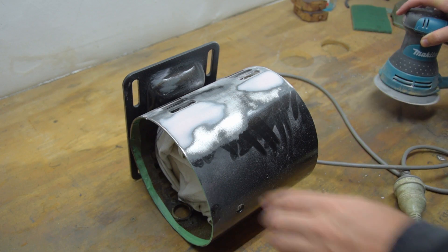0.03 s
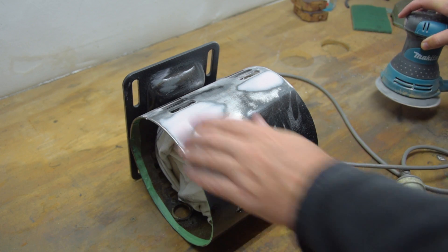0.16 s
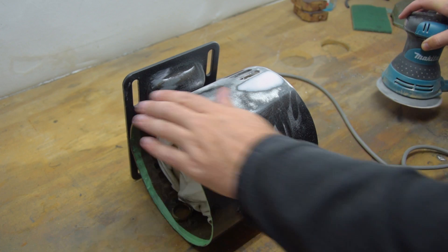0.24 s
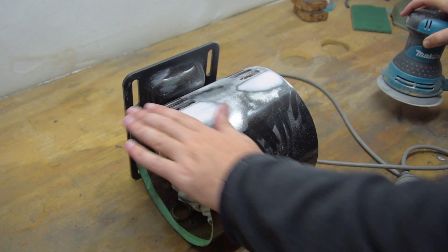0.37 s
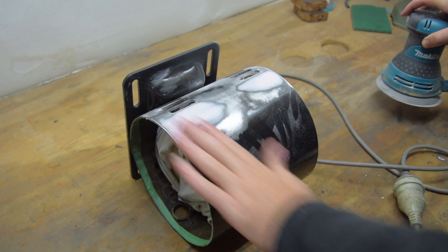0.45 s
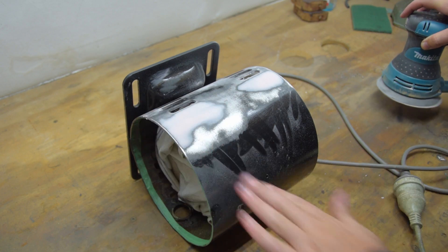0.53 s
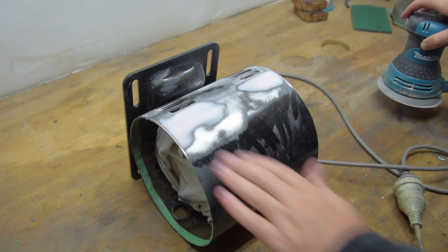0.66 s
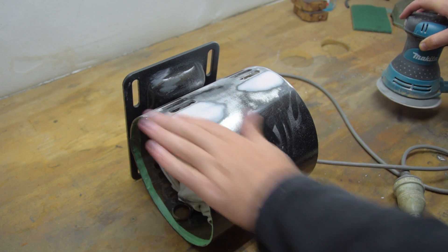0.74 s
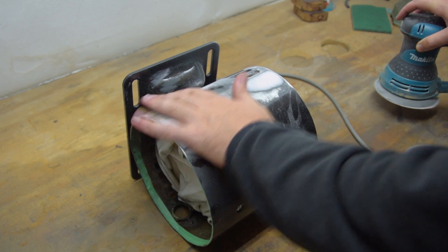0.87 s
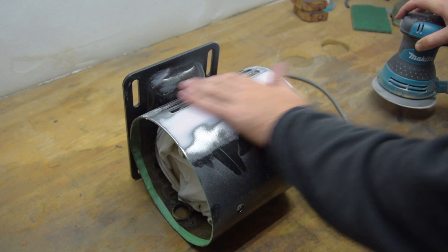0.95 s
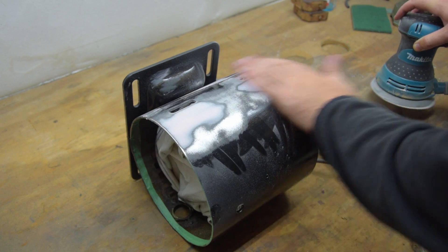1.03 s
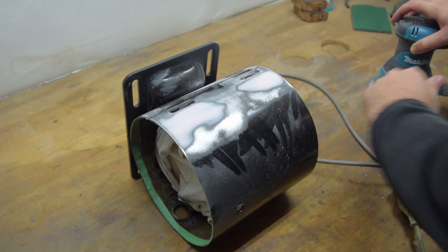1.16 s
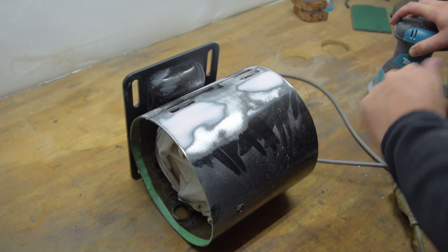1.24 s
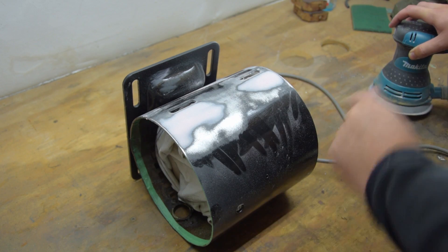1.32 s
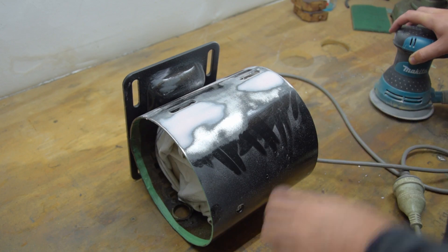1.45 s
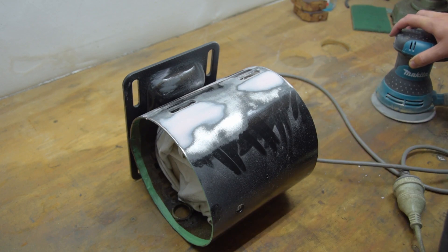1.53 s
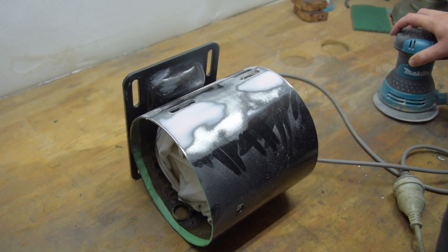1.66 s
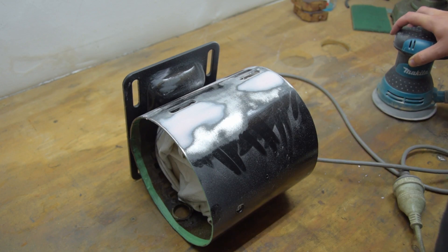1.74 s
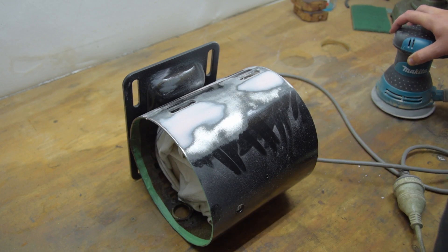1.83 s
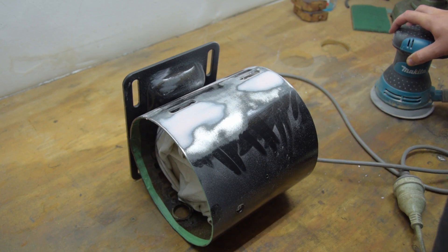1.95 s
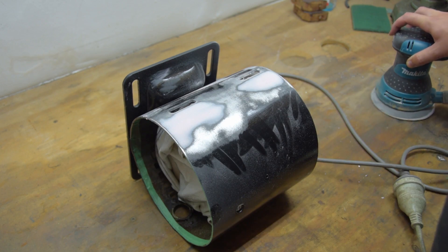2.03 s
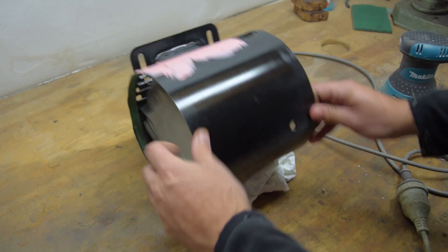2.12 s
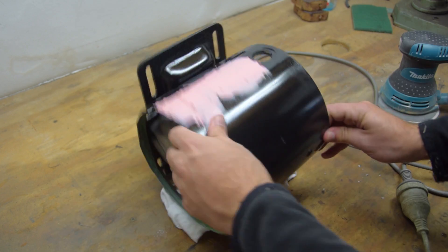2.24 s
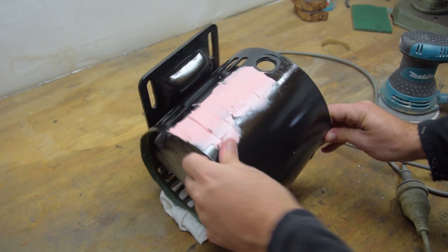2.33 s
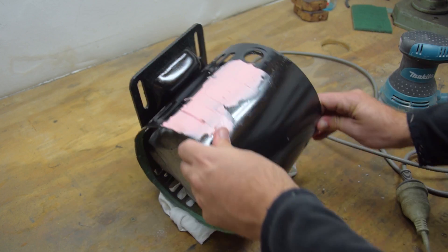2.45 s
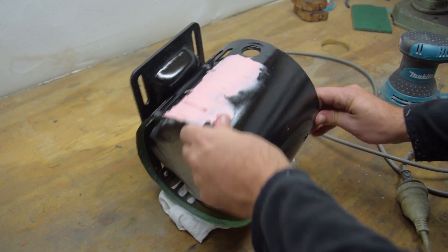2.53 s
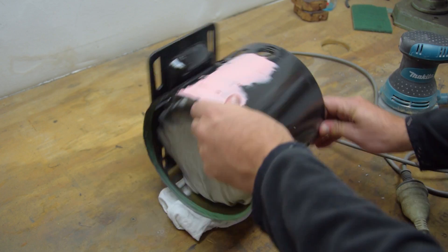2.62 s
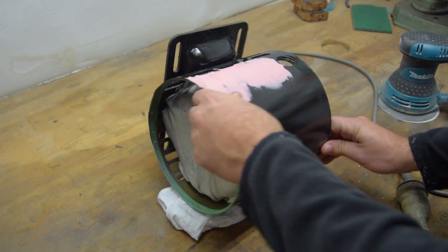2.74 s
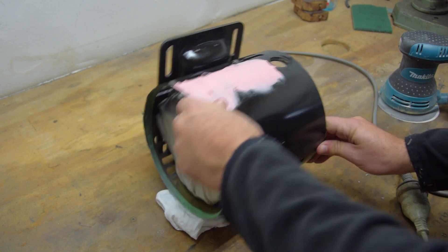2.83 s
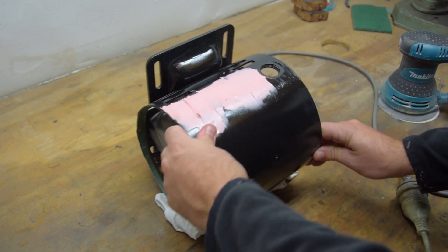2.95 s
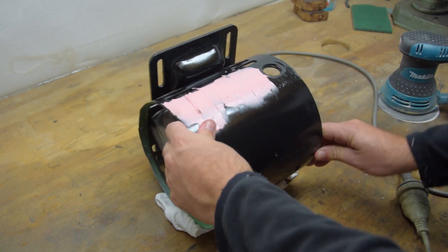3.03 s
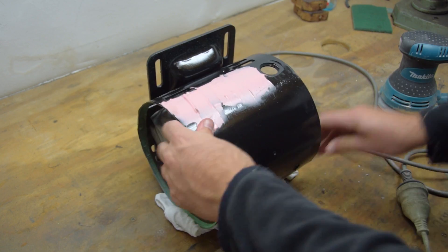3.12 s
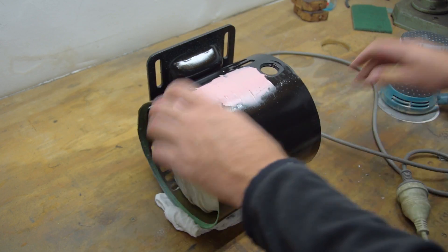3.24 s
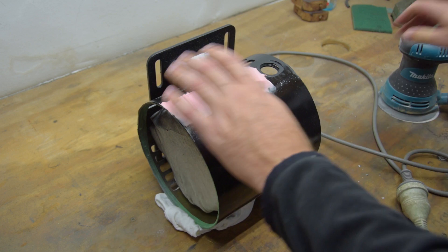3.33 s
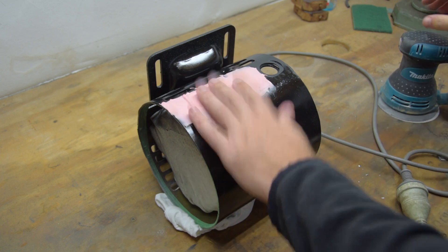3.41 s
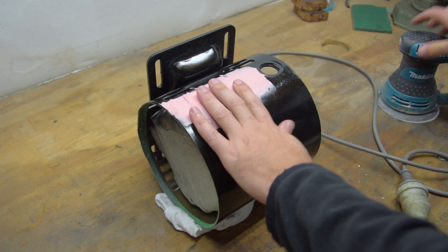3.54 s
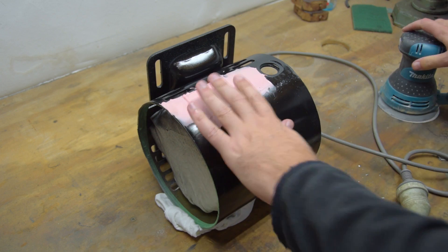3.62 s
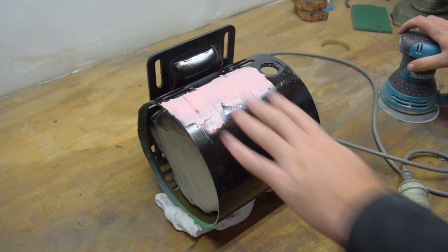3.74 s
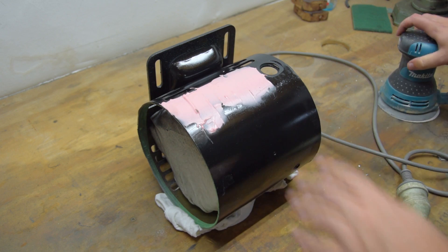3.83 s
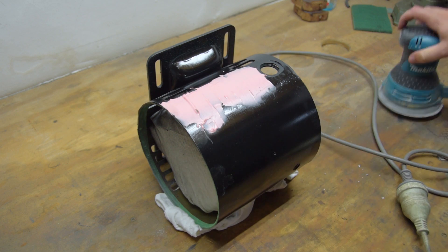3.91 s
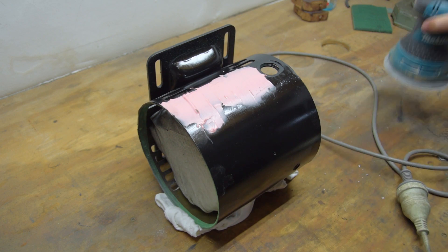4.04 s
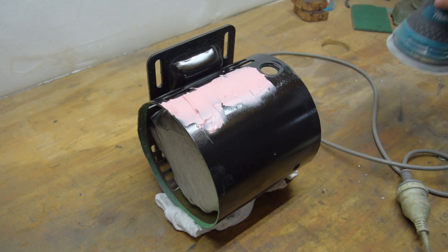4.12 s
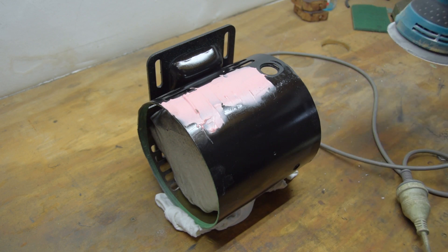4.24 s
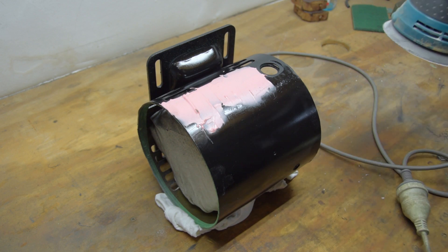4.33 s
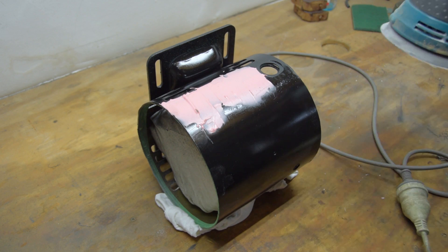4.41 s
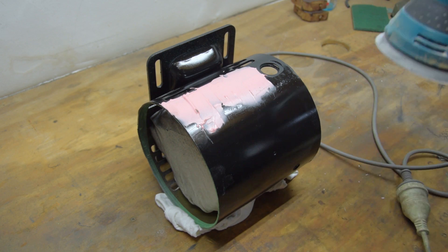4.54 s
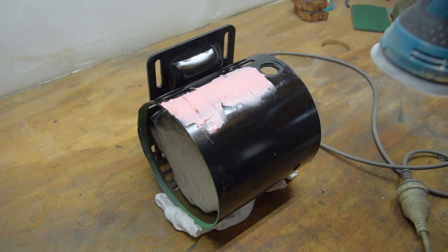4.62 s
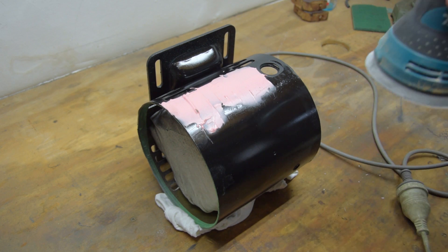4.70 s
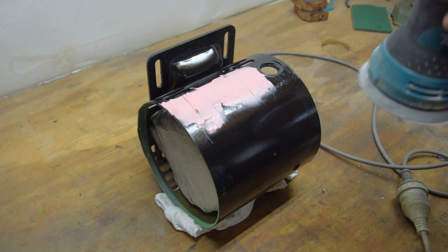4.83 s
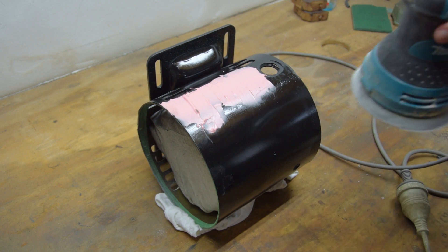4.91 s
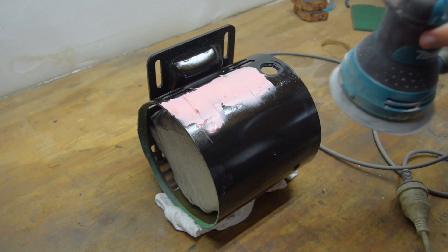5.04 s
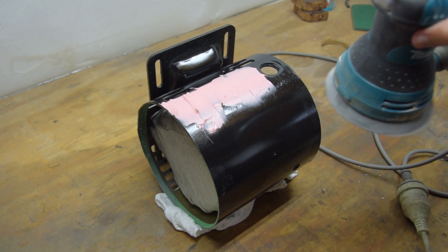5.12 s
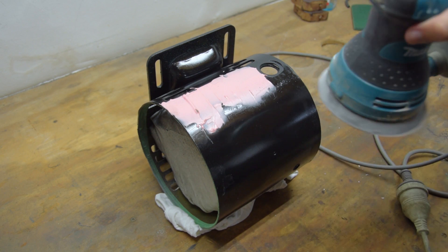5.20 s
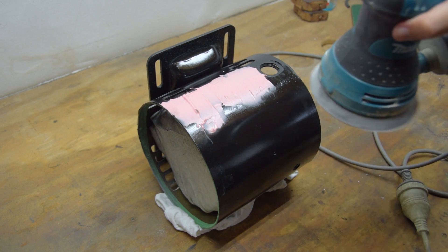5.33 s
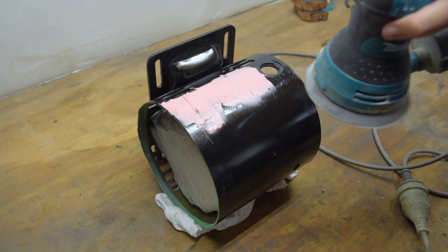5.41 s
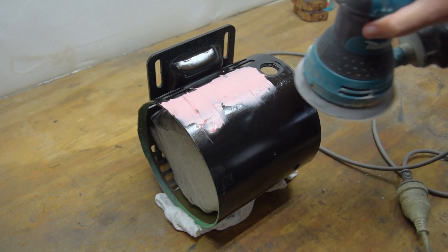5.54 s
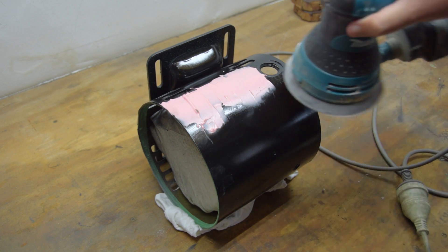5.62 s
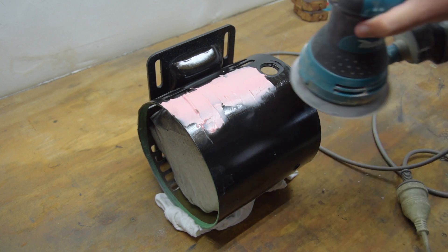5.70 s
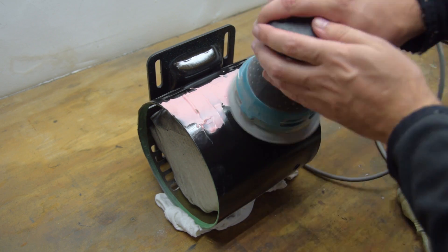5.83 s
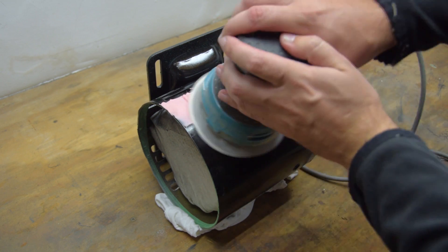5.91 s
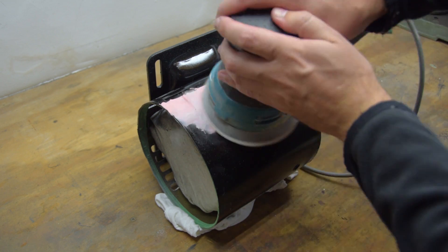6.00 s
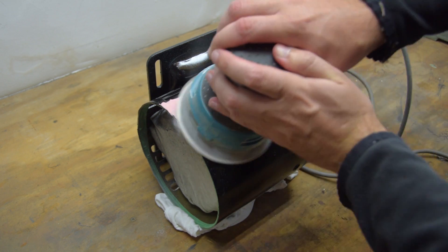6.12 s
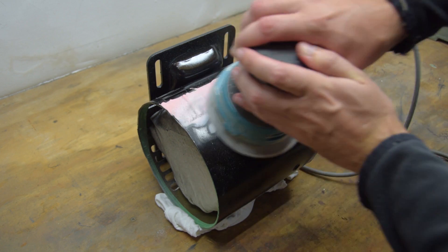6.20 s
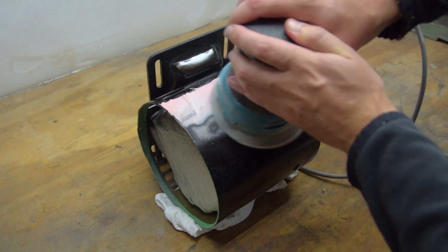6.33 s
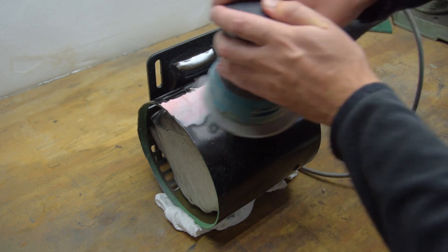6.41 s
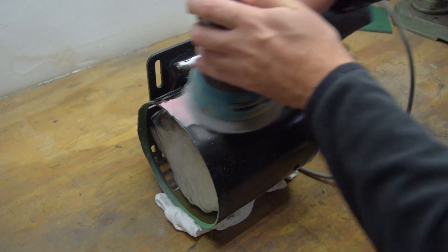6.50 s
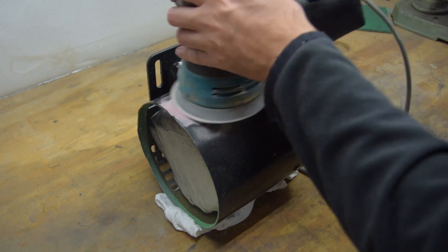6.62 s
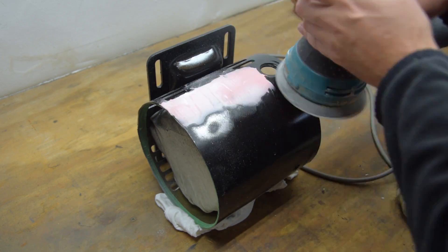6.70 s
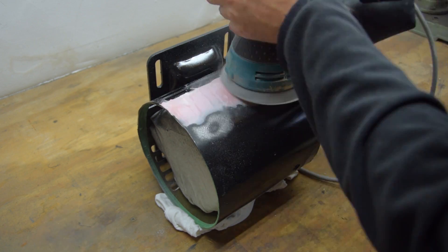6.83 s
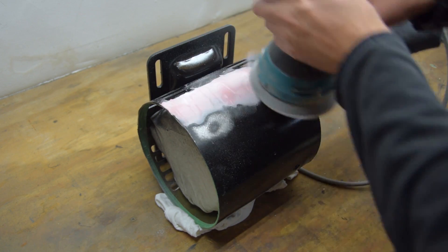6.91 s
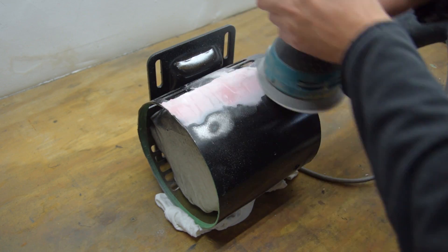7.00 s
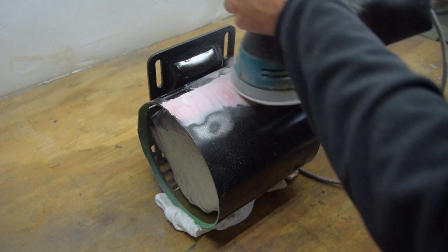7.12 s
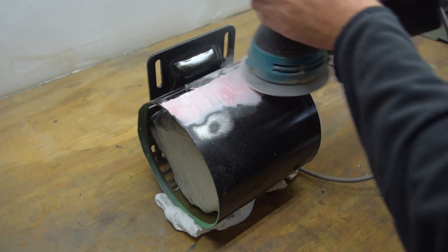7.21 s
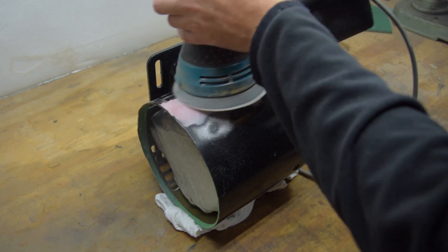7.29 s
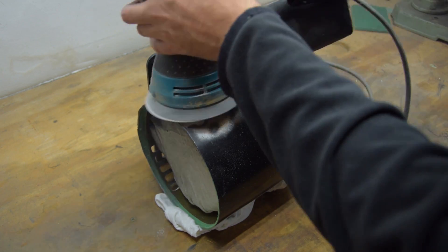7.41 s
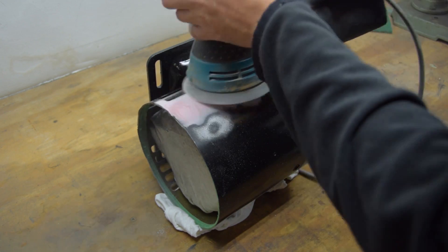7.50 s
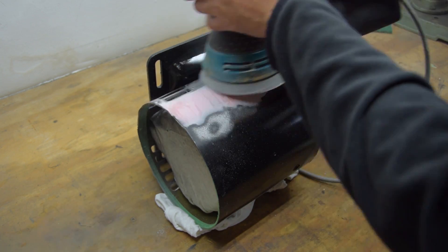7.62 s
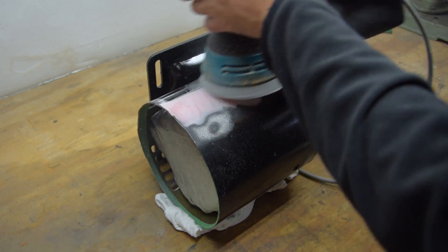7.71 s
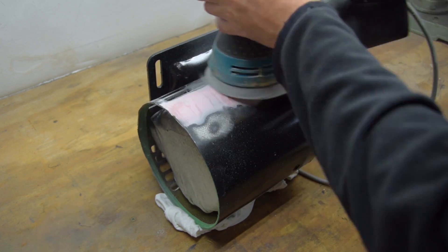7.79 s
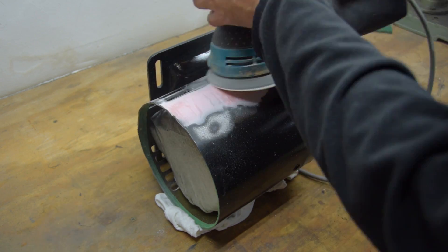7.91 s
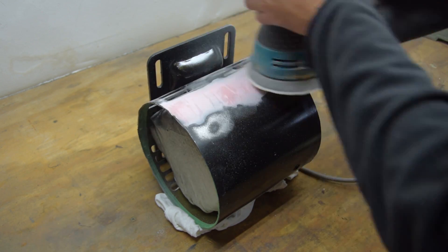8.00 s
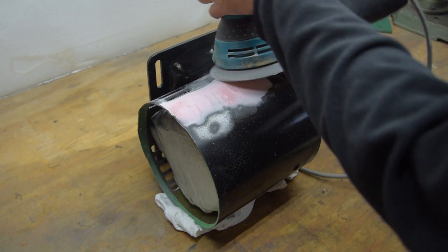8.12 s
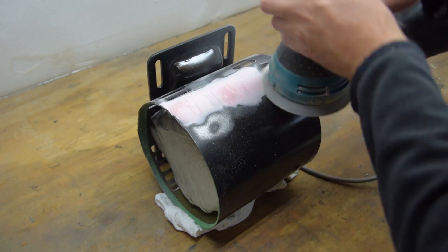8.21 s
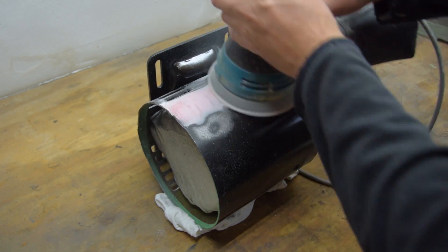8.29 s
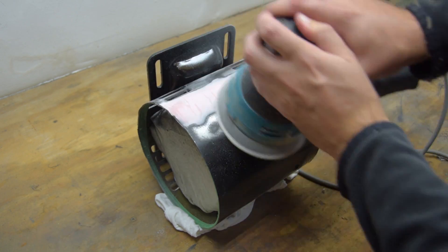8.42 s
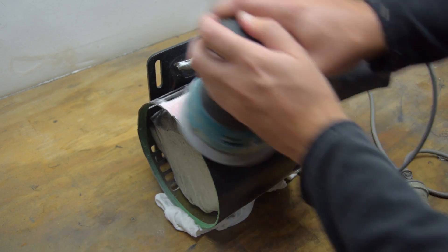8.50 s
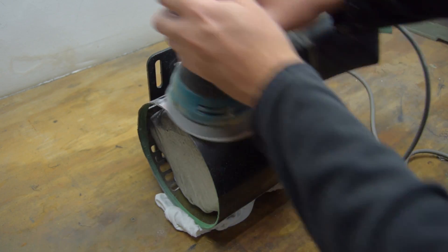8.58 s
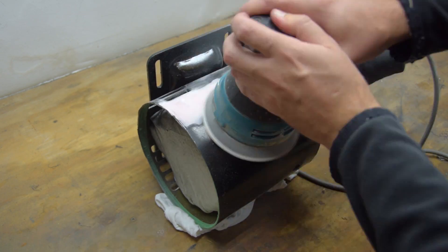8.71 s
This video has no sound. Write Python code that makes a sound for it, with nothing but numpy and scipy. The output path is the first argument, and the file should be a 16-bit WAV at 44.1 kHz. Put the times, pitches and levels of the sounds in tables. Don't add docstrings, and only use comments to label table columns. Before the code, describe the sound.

From 0 to 2.2 seconds a switched-off orbital sander coasts down close by: brush whine and breathy fan roar slide lower and fade, with a faint early knock. At 2.2 the motor abruptly vanishes into quiet workshop air. A sheet-metal housing bumps the wooden bench, softly at 2.4, then with strong hollow thuds and hard clacks at 2.65 and 2.95, and lighter ones near 2.8 and 3.13. A dry bright tick follows at 3.2, then small touches and rustles. A sharp multiple switch click sounds at 4.06, leaving near silence. At 4.85 the motor starts, rising quickly to a high whine. A hard cut at 5.77 and loud snaps to 5.86 lead into sanding: low hum, buzzing whine and gritty hiss, slightly wavering as pressure changes, with a brief ringing rub around 7.5, continuing until the abrupt end at 8.75. The small hard room adds short echoes.

```python
import sys
import numpy as np
from scipy import signal
from scipy.fft import rfft, irfft, next_fast_len
from scipy.io import wavfile

SR = 44100
rng = np.random.default_rng(int(sys.argv[2]) if len(sys.argv) > 2 else 0)


def to_wav(s):
    ch = np.atleast_2d(s).T
    pcm = np.round(np.clip(ch, -1, 1) * 32767)
    wavfile.write(sys.argv[1], SR, pcm.astype(np.int16))


def boost(x):
    u = np.asarray(x, float) / 20
    return 10 ** u


N = 385875
TIME = np.arange(N) / SR
THIRD_OCTAVES_HZ = 40 * 2 ** np.arange(0, 8.8, 1 / 3)

CHANGES_S = [
    0,
    2.187,
    4.85,
    5.7736,
    8.75,
]
SHAFT_ORDERS = (2, 3, 4, 5, 6, 7, 9, 12, 16, 17)
SHAFT_DB = [-2, -0.1, -6.5, -6.5, -5.5, -5, -12, -11.5, -4.5, 2]
BAR_ORDERS = (36, 48, 60, 72, 84, 96, 108, 120, 132, 144, 156, 168)
BAR_DB = [-10, -7, -11, -13, -15, -14, -14, -16, -17, -17, -18, -18]
# (frequency [Hz], density [dB per Hz])
COAST_AIR = [(40, -27.5), (100, -37), (250, -19), (700, -10.5), (1200, 3.5), (1600, -3.5), (2200, 2),
             (3000, 5.5), (3600, 3.5), (4000, -1.5), (5000, -3), (7000, -11), (10000, -20), (15500, -32)]
FREE_AIR = [(40, -38), (100, -34), (250, -13), (500, -4), (900, -3.5), (1600, -3.5), (2200, -0.5),
            (3000, 4), (3600, -2), (3950, -5), (5500, -6.5), (7000, -9), (10000, -16.5), (15500, -25.5)]
LOADED_AIR = [(40, -34), (120, -19.5), (300, -13), (500, -11), (900, -4), (1600, 0), (2300, 2), (3000, 3.5),
              (3650, 1.5), (3950, -2), (5500, -7), (7000, -12.5), (11000, -18.5), (15500, -24.5)]
# (frequency [Hz], width [Hz], level against roar [dB], share of slow-speed gain [1])
CASING_WHISTLES = [(1760, 30, -20, 2.4), (2800, 250, -18, .5), (3300, 250, -16, .5), (5000, 400, -21, 1),
                   (8300, 500, -32, 1.5)]
# (frequency [Hz], level [dB])
BRUSH_RING = [(1500, -3), (2600, 1), (3200, -7), (4100, -2), (5300, 4), (6000, 0), (7200, 2), (9000, -2),
              (15000, 1)]
# (frequency [Hz], level [dB])
FAN_WHINE = [(650, -100.5), (1200, -77.5), (2000, -72), (2250, -63), (2550, -62), (2900, -59), (3200, -53),
             (3700, -54.5)]
BAR_WHINE = [(900, -103), (1300, -66), (1800, -61.5), (2450, -47), (3100, -46), (3700, -45.5), (4200, -49),
             (4900, -48)]
# (shaft speed [Hz], level [dB])
COAST_HUM = [(37, -88), (88, -60), (99, -50.5), (113, -57), (126, -42.5), (140, -53), (156, -38.5),
             (166, -45.5)]
SPIN_UP_HUM = [(31, -100), (79, -64), (102, -63), (125, -48.5), (145, -53), (160, -56), (172, -51.5),
               (203, -38.5)]
# (level at full speed [dB], slope [dB per octave of speed], slope [dB per dB of pressure])
COAST_LAW = [
    (-54.5, 11.5, 0),
    (-4, 6.5, -0.5),
    (-1, 1, 0),
    (-51, 8, 0),
    (-39.5, 8.5, 0),
    (-46.5, 11, 0),
]
SPIN_UP_LAW = [
    (-56.5, 11, 0.0097),
    (3.5, 0, 0),
    (0, 1.5, 0.0069),
    (-63, 1, 0),
    (-39.5, 7, 0.012),
    (-50, 12, 0.0052),
]
SANDING_LAW = [
    (-56, -24, 0.8),
    (0.5, 33, -2.5),
    (-2, 11, -0.8),
    (-54.5, 22, 0.73),
    (-40, 22, -0.2),
    (-49, -7, 0.2),
]
# (time [s], shaft speed [Hz], vents turned to the microphone [dB])
SPIN_UP = [(4.85, 31.45, -10), (4.92, 59.06, -10), (4.99, 87, -6), (5.03, 101.7, -2), (5.1, 125.4, 3.5),
           (5.18, 144.7, 2.5), (5.26, 160, -6), (5.4, 178.9, -2), (5.55, 192.6, 3.5), (5.775, 203.2, -1)]
# (time [s], shaft speed [Hz], pressure heard as hum [dB], vents turned to the microphone [dB])
PRESSING = [(5.775, 203.6, -36.5, -7), (5.85, 205, -35, 2), (5.993, 203.2, -35.5, 4.5),
            (6.18, 204.2, -36.5, -0.5), (6.21, 203.8, -37, -4), (6.27, 202.8, -38.5, -4),
            (6.369, 206.5, -35.5, -3), (6.471, 204, -35.5, 0.5), (6.62, 202.6, -33.5, -2),
            (6.65, 201.7, -32, 10.5), (6.745, 200.7, -33.5, 10), (6.775, 204.5, -35, -5),
            (6.81, 210.5, -36, 3), (6.86, 204.3, -31.5, 1), (6.89, 200.3, -33.5, 6), (6.96, 200.7, -32, -6),
            (7.0, 199.7, -32.5, 1), (7.16, 197.7, -32.5, 6), (7.199, 200.2, -32, 4.5),
            (7.264, 206.1, -31.5, 6), (7.361, 197.4, -34, -2.5), (7.5, 196.7, -33.5, 4),
            (7.6, 199, -32, -4), (7.72, 202.6, -33.5, -0.5), (7.83, 203.9, -33, 7.5),
            (7.89, 201, -32.5, -1), (7.98, 201.1, -33, 5), (8.201, 208.3, -31.5, -2),
            (8.453, 194.5, -33, 0), (8.651, 198.4, -33, -2)]
# (time [s], share of speed [1], width [s])
EASING = [
    (7.265, .008, .03),
    (8.26, .01, .03),
]
# (frequency [Hz], t60 [s], levels when struck at rag, rim, foot, bracket [dB])
BENCH_MODES = [(63.4, 0.26, -6, -9, -21, -4.5), (83, 0.22, 3.5, -11.5, -10.5, -2),
               (107, 0.34, -15, 0, -7.5, -9), (130.8, 0.4, -10, -7.5, -10, -5.5),
               (158, 0.15, -11, -8, -1, -3.5), (163, .12, -15, -14.5, -7.5, -11.5),
               (230, 0.5, -29, -21.5, -17, -17), (263, .36, -20, -22.5, -8.5, -16.5),
               (286.8, 0.21, -19, -13.5, -14, -5.5), (340, .25, -30, -23, -14, -18.5),
               (393.7, 0.2, -34, -24, -8, -14), (500, .1, -34, -11.5, -21.5, -5.5),
               (557, 0.16, -38, -15, -25, -15.5), (712, 0.3, -40, -27, -23, -17.5)]
# (time [s], thud [dB], knock [dB],
# contact [ms])
BLOWS = [(0.38, -58, -58, 1.8), (2.3662, -26, -66, 4.2), (2.4587, -22.5, -49.5, 2),
         (2.4782, -45, -59, 1.6), (2.653, -11, -27.5, 2.73), (2.7887, -33.5, -65.5, 1.2),
         (2.9435, -13, -27, 1.18), (3.1267, -24.5, -45, 1.17), (3.3219, -56, -69, 1.7),
         (3.479, -53.5, -66, 1.4), (3.6451, -60.5, -71, 3.5), (4.0234, -66, -54, 1.1),
         (4.0436, -66, -63, 1.1), (4.0647, -75, -48, 1.1), (4.0671, -70, -46, 1.1),
         (4.8338, -69, -64.5, 1.5)]
STRUCK_AT = (1, 0, 1, 2, 2, 1, 3, 1, 1, 1, 0, 2, 2, 2, 2, 1)
# (time [s], peak [dB], centre [Hz], half width [octaves], chatter [ms])
EDGE_CLICKS = [(0.3794, -47, 3500, 0.91, .4), (2.3722, -66.5, 2200, 1, 4.), (2.459, -61, 2300, 0.53, 2.7),
               (2.6562, -40.5, 1994, 0.79, 7.), (2.69, -64, 4800, 0.44, .4),
               (2.693, -47.5, 2580, 0.55, 1.3), (2.7897, -64, 4200, 0.97, 2.5),
               (2.9445, -37, 2700, 0.42, 2.4), (3.016, -68, 3200, 0.55, .6), (3.1268, -50, 1510, .7, 0.43),
               (3.3224, -62, 900, .6, .6), (3.48, -67, 3000, 2.3, 3.3), (3.603, -58.5, 4300, 0.55, 0.54),
               (3.6443, -72.5, 4500, 1.1, 3.7), (3.891, -69.5, 2400, .8, .8), (3.904, -65, 2000, 1.1, 1.9),
               (4.0238, -43, 2350, 0.41, 1.5), (4.0443, -62, 1900, 0.63, 2.4), (4.064, -39, 2180, 0.76, .6),
               (4.0669, -29.5, 2630, 0.99, 1.1), (4.8345, -58, 4520, 1.3, 0.45),
               (4.861, -56, 2200, 0.78, .6)]
# (time [s], frequency [Hz],
# peak [dB], t60 [s])
TICKS = [(2.322, 1280, -58, 0.022), (2.373, 3200, -64, .03), (2.4597, 2100, -52, 0.014),
         (2.479, 3400, -59, .03), (3.483, 1100, -57, 0.06), (3.483, 640, -55.5, .07),
         (4.025, 3150, -65, 0.017), (4.2, 1550, -51, 0.024), (4.06, 1300, -30, 0.021),
         (4.0764, 2200, -34.5, .02), (4.06, 3050, -23, .02), (4.0683, 4200, -50.5, .015),
         (2.9465, 2500, -27.5, 0.017), (2.9465, 900, -34.5, 0.09), (2.655, 1010, -35.5, 0.057),
         (2.656, 460, -29, .12), (2.656, 430, -31, 0.18), (2.657, 1200, -40.5, .08),
         (4.069, 160, -44, 0.17), (4.069, 120, -49.5, .4), (4.069, 131, -49, .5), (4.069, 450, -41.5, .05),
         (4.069, 1100, -46, .08), (2.9465, 1210, -37.5, .08), (2.462, 700, -40.5, 0.081),
         (2.319, 90, -53.5, 0.073)]
# (time [s], peak [dB], lowest [Hz], highest [Hz])
SNAPS = [
    (.002, -40, 40, 13000),
    (3.193, -38, 4500, 14000),
    (4.0685, -40, 3500, 9000),
    (4.835, -54, 5000, 15000),
    (5.7736, -14, 2000, 15000),
    (5.7737, -23, 45, 2000),
    (5.8162, -5, 700, 8000),
    (5.8587, -16, 2000, 11000),
    (8.746, -30, 60, 13000),
]
# (time [s], length [s], centre [Hz], level [dB])
RUSTLES = [(1.11, .04, 9000, -52), (1.62, .09, 8700, -62), (1.63, .1, 250, -54.5), (2.165, .05, 7900, -60),
           (2.17, .05, 127, -56), (3.05, .25, 7000, -84), (3.5, .06, 84, -55), (3.645, .04, 6860, -71.5),
           (3.703, .17, 85, -69), (3.9, .26, 500, -72), (3.9, .18, 3000, -76), (4.3, .15, 160, -66),
           (4.87, .05, 110, -64)]
# (time [s], half length [s], frequency [Hz], level [dB], t60 [s])
SHELL_SINGS = [
    (7.53, .1, 1790, -51, .12),
    (3.06, .105, 3400, -65, .004),
    (3.06, .105, 5900, -77, .005),
    (3.05, .11, 7900, -79, .005),
    (6.815, .04, 3150, -47, .003),
]
# (time [s], level on background [dB])
HUSH = [
    (4.05, 2),
    (4.45, -1.5),
    (4.9, -8.5),
    (5.0, -1.5),
]
# (frequency [Hz], level [dB])
WORKSHOP_AIR = [(30, -28), (90, -4), (400, -2.5), (900, -13.5), (1800, -16), (3300, -17), (6000, -24),
                (15500, -26.5)]
# (frequency [Hz], t60 [s])
ROOM_T60 = [(60, 0.67), (250, 1), (1000, 0.45), (3000, 0.47), (7000, 0.11), (15000, 0.31)]
# (frequency [Hz], side against mid [dB])
SIDE_DB = [(60, -53.5), (200, -40.5), (380, -17.5), (1000, -20.5), (2400, -28.5), (4400, -20.5),
           (8000, -8.5), (15000, -9.5)]

FULL_HZ, USUAL_HUM_DB = 205, -34
COAST_START_HZ, COAST_TAU_S, FRICTION_HZ = 165.5, 2.25, 39.46
AIR_LAG_DB, AIR_LAG_S = -21.5, 0.017
FLOOR_DB, WHINE_HZ, WHINE_DB = -75, 15631, -86
SELF_NOISE_DB = -84


def rms_one(x):
    return x / np.sqrt(np.mean(x ** 2) + 1e-20)


def at_hz(points, hz):
    table_hz, value = np.transpose(points)
    return np.interp(np.log(hz), np.log(table_hz), value)


def drift(rate, size):
    r = np.exp(-80 * np.pi * rate / SR)
    slow = signal.lfilter([1], [1, -2 * r, r * r], rng.standard_normal(size // 40 + 1002))[1000:]
    return np.interp(np.arange(size) / 40, np.arange(len(slow)), rms_one(slow))


def band(x, low_hz, high_hz):
    sos = signal.butter(2, [low_hz, min(high_hz, .45 * SR)], "band", fs=SR, output="sos")
    return signal.sosfilt(sos, x)


def ring(clicks, hz, t60):
    r, w = boost(-60 / (t60 * SR)), 2 * np.pi * hz / SR
    return signal.lfilter([0, np.sin(w)], [1, -2 * r * np.cos(w), r * r], clicks + 1e-18)


def noise_bands(size):
    white = rng.standard_normal((2, size))
    for k, (low, high) in enumerate(zip(THIRD_OCTAVES_HZ, THIRD_OCTAVES_HZ[1:])):
        yield np.sqrt(low * high), band(white[k % 2], low, high)


def room_tail(t60_scale, size):
    t = TIME[:size]
    tail = sum(noise * boost(-60 * t / (t60_scale * at_hz(ROOM_T60, hz))) for hz, noise in noise_bands(size))
    tail = tail * np.clip(t / 0.00067, 0, 1)
    return tail / np.sqrt(np.sum(tail ** 2))


def air(spectrum, low_db, roar_db, hiss_db, patchy_db):
    hz = np.geomspace(250, 15000, 600)
    power = boost(2 * at_hz(spectrum, hz)) * np.gradient(hz)
    zones_hz = [(250, 900), (900, 6000), (6000, 15001)]
    zones = [power[(hz >= low) & (hz < high)].sum() for low, high in zones_hz]
    levels = np.array([low_db, roar_db, hiss_db]) - 10 * np.log10(zones)[:, None]
    size = len(low_db)
    out, together = 0, drift(0.58, size)
    for centre, noise in noise_bands(size):
        place = np.interp(np.log(centre), np.log([600, 1200, 4500, 8000]), [0, 1, 1, 2])
        share = np.clip(1 - abs(place - np.arange(3)), 0, 1)
        flicker = patchy_db * (0.5 * together + drift(24.0, size))
        out = out + noise * boost(share @ levels + flicker)
    padded = next_fast_len(size)
    colour = boost(at_hz(spectrum, np.arange(padded // 2 + 1) * SR / padded + 1))
    return irfft(rfft(out, padded) * colour, padded)[:size] * np.sqrt(SR / 2)


def motor(span, shaft_hz, hum_db, law, spectrum, wobble, throb, lines_db, lift_db, casing_db, masked_db,
          lag_db=0, facing_db=0, strain_db=0):
    first, last = round(span[0] * SR), min(round(span[1] * SR), N)
    shaft_hz, hum_db, size = shaft_hz[first:last], hum_db[first:last], last - first
    slowness = np.log2(FULL_HZ / shaft_hz)
    pressure_db = hum_db - USUAL_HUM_DB
    third_db, fan_db, bar_db, *noise_db = [
        db - per_octave * slowness + per_db * pressure_db for db, per_octave, per_db in law]
    noise_db = noise_db + lag_db * np.exp(-TIME[:size] / AIR_LAG_S)
    roar_db = noise_db[1]
    for at, share, width in EASING:
        shaft_hz = shaft_hz * (1 + share * np.exp(-((TIME[first:last] - at) / width) ** 2))
    turn = 2 * np.pi * np.cumsum(shaft_hz * (1 + wobble * drift(21.4, size))) / SR + rng.uniform(0, 7)

    lines = boost(hum_db + 1.1 * drift(1.47, size)) * np.sin(turn)
    for k, db in zip(SHAFT_ORDERS, SHAFT_DB):
        level_db = third_db + db + (k == 2) * strain_db * slowness
        lines += boost(level_db + 4.0 * drift(26.0, size)) * np.sin(k * turn + k)

    fan_order, bar_order = 18, 24
    fan_db = fan_db + at_hz(FAN_WHINE, fan_order * shaft_hz)
    bar_db = bar_db + facing_db + at_hz(BAR_WHINE, bar_order * shaft_hz)
    whine = boost(fan_db + 4.1 * drift(25, size) + 1.1 * drift(7.4, size)) * np.sin(fan_order * turn)
    whine += boost(bar_db + 3.77 * drift(35, size)) * np.sin(bar_order * turn)
    for k, db in zip(BAR_ORDERS, BAR_DB):
        hz = k * shaft_hz
        level_db = roar_db + lines_db + db + at_hz(spectrum, hz) + at_hz(BRUSH_RING, hz)
        level_db += lift_db * slowness
        level_db += masked_db * (k != 48) + 2.8 * drift(11, size)
        whine += boost(level_db) * np.sin(k * turn + k) * (hz < 15500)
    whine *= 1 + .5 * np.sin(turn + 1)

    noise = air(spectrum, *noise_db, patchy_db=1.02)
    for hz, width_hz, db, share in CASING_WHISTLES:
        t60 = np.log(1000) / np.pi / width_hz
        level_db = roar_db + db + share * casing_db * slowness + 1.5 * drift(7.5, size)
        noise += boost(level_db) * rms_one(ring(rng.standard_normal(size), hz, t60))
    out = np.zeros(N)
    out[first:last] = np.sqrt(2) * (lines + whine) + noise * (1 + throb * np.sin(turn))
    return out


def coasting():
    hz = (COAST_START_HZ + FRICTION_HZ) * np.exp(-TIME / COAST_TAU_S) - FRICTION_HZ
    hz = np.maximum(hz, 20)
    return motor(CHANGES_S[0:2], hz, at_hz(COAST_HUM, hz), COAST_LAW, COAST_AIR, wobble=.0015, throb=.15,
                 lines_db=-3.5, lift_db=0, casing_db=2.5, masked_db=0)


def workshop_floor():
    noise = sum(n * boost(at_hz(WORKSHOP_AIR, hz)) for hz, n in noise_bands(N))
    return boost(FLOOR_DB) * rms_one(noise) + boost(WHINE_DB) * np.sin(2 * np.pi * WHINE_HZ * TIME)


def hush():
    return boost(np.interp(TIME, *np.transpose(HUSH)))


def snaps():
    out = np.zeros(N)
    for s, db, low_hz, high_hz in SNAPS:
        at = round(s * SR)
        out[at:at + 150] += boost(db) * band(np.arange(150) == 0, low_hz, high_hz)
    return out


def blows():
    pushes, knock = np.zeros((4, N)), np.zeros(N)
    for (s, thud_db, knock_db, contact_ms), spot in zip(BLOWS, STRUCK_AT):
        push = np.sin(np.pi * np.clip(TIME[1:400] * 1000 / contact_ms, 0, 1)) ** 2
        sharp = push ** 16
        i = round((s + .001) * SR)
        pushes[spot, i:i + 399] -= boost(thud_db) * push / push.sum()
        knock[i:i + 399] -= boost(knock_db) * sharp / sharp.sum()
    modes = sum(ring(boost(np.array(spot_db)) @ pushes, hz, t60) for hz, t60, *spot_db in BENCH_MODES)
    boom = band(band(pushes.sum(axis=0), 70, 450), 60, 900)
    knock = band(band(knock, 350, 1300), 200, 3000)
    return modes, boom, boost(32) * knock


def edge_clicks():
    clack, burst = np.zeros((2, N))
    first = np.arange(900) == 0
    luck = rng.standard_normal((len(EDGE_CLICKS), 900))
    for (s, db, hz, octaves, chatter_ms), touch in zip(EDGE_CLICKS, luck):
        i, spread = round((s + .0015) * SR), 2 ** np.clip(octaves, .1, 2)
        touch = boost(-7.0) * touch * np.exp(-TIME[:900] * 1000 / chatter_ms) + first
        touch = np.array([touch, np.linalg.norm(touch) * first])
        touch = band(touch, hz / spread, hz * spread)
        near, far = boost(db) * band(touch, hz / spread / 2, hz * spread * 2)
        clack[i:i + 900] -= near
        burst[i:i + 900] -= far
    return [boost(10) * (x + boost(-9) * band(x, 2500, 3800)) for x in (clack, burst)]


def brief_rings():
    out = np.zeros(N)
    for s, hz, db, t60 in TICKS:
        i = round(s * SR)
        out[i:i + 8000] += boost(db) * ring(np.arange(8000) == 0, hz, t60)
    return out


def bumps():
    modes, boom, knock = blows()
    clack, burst = edge_clicks()
    ticks = brief_rings()
    direct = band(modes, 67, 1800) + boost(2.5) * knock + boost(7.5) * clack + ticks
    to_room = boost(24.5) * boom + boost(3.0) * (knock + burst) + boost(-20) * ticks
    return direct + signal.fftconvolve(to_room, room_tail(0.92, size=30000))[:N]


def rustles():
    out = np.zeros(N)
    for s, length, hz, db in RUSTLES:
        near = slice(round((s - length) * SR), round((s + length) * SR))
        size = near.stop - near.start
        grain = rng.standard_normal(size) * boost(2.8 * drift(150, size))
        cloth = rms_one(band(band(grain, hz / 2, hz * 2), hz / 2, hz * 2))
        out[near] += boost(db) * cloth * np.exp(-8 * ((TIME[near] - s) / length) ** 2)
    change = round(CHANGES_S[1] * SR)
    out[change:change + 4000] = 0
    return out


def singing():
    out = np.zeros(N)
    for s, width, hz, db, t60 in SHELL_SINGS:
        near = slice(round(s * SR) - 9000, round(s * SR) + 9000)
        tone = rms_one(ring(rng.standard_normal(18000), hz, t60))
        out[near] += boost(db) * tone * np.exp(-((TIME[near] - s) / width) ** 6)
    return out


def spinning_up():
    s, *columns = np.transpose(SPIN_UP)
    hz, facing_db = [np.interp(TIME, s, c) for c in columns]
    facing_db = facing_db[round(CHANGES_S[2] * SR):round(CHANGES_S[3] * SR)]
    return motor(CHANGES_S[2:4], hz, at_hz(SPIN_UP_HUM, hz), SPIN_UP_LAW, FREE_AIR, wobble=.0015, throb=.15,
                 lines_db=0, lift_db=-4, casing_db=2.5, masked_db=-7, lag_db=AIR_LAG_DB, facing_db=facing_db)


def sanding():
    s, *columns = np.transpose(PRESSING)
    hz, hum_db, facing_db = [np.interp(TIME, s, c) for c in columns]
    facing_db = facing_db[round(CHANGES_S[3] * SR):]
    return motor(CHANGES_S[3:5], hz, hum_db, SANDING_LAW, LOADED_AIR, wobble=0.0034, throb=0.063,
                 lines_db=-1, lift_db=4, casing_db=0, masked_db=-2, lag_db=-9, strain_db=90, facing_db=facing_db)


def scene():
    coast, spin, loaded = coasting(), spinning_up(), sanding()
    background = hush() * workshop_floor()
    mid = coast + spin + loaded + background + snaps() + bumps() + rustles() + singing()
    size = next_fast_len(N + 4000)
    colour = boost(at_hz(SIDE_DB, np.arange(size // 2 + 1) * SR / size + 1))
    wide = boost(-26.5) * coast + boost(-28.0) * spin + loaded
    side = irfft(rfft(wide, size) * rfft(room_tail(0.13, size=3000), size) * colour, size)[:N]
    return np.array([mid + side, mid - side])


def top_cut(x):
    return signal.sosfilt(signal.butter(12, 15860, fs=SR, output="sos"), x)


def record(dry):
    mix = dry + boost(SELF_NOISE_DB) * hush() * rng.standard_normal(dry.shape)
    mix = signal.sosfilt(signal.butter(3, 45, "high", fs=SR, output="sos"), mix)
    return top_cut(mix)


dry = scene()
out = record(dry)
to_wav(out)
```